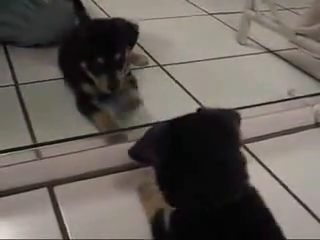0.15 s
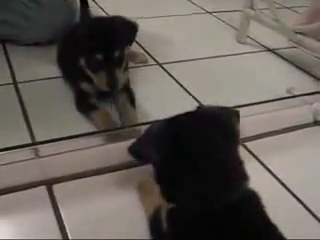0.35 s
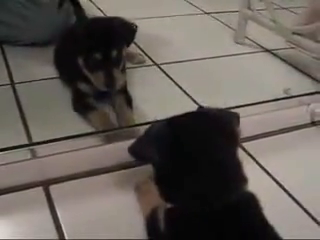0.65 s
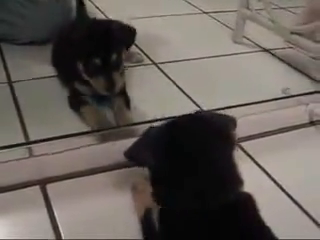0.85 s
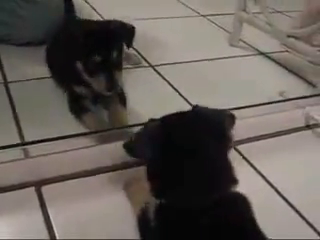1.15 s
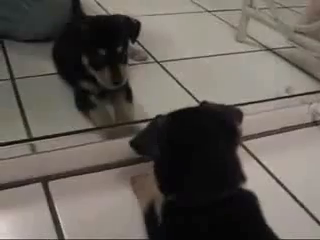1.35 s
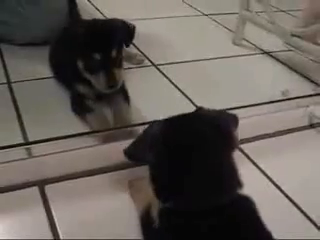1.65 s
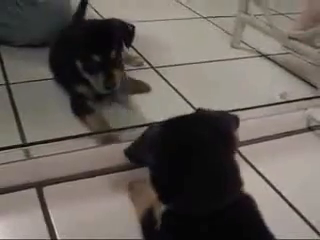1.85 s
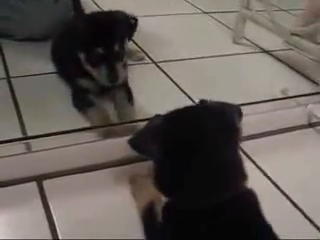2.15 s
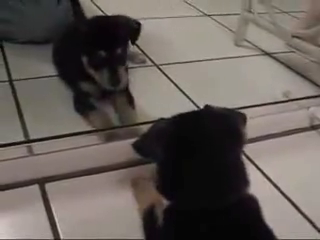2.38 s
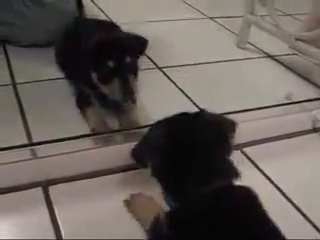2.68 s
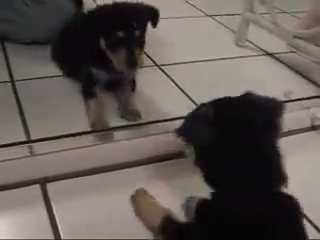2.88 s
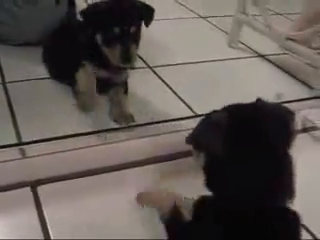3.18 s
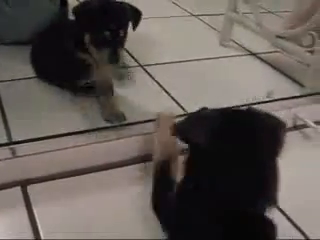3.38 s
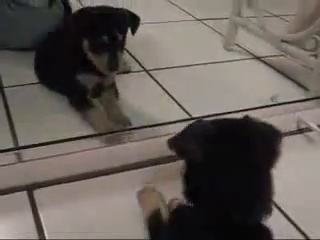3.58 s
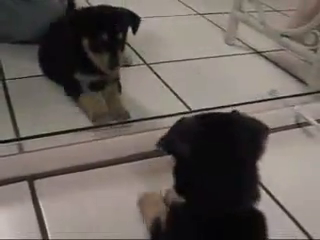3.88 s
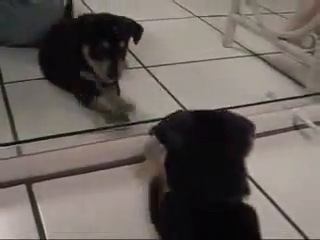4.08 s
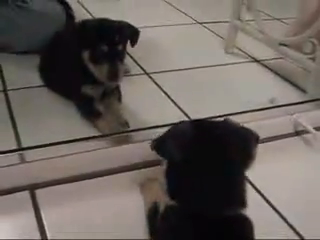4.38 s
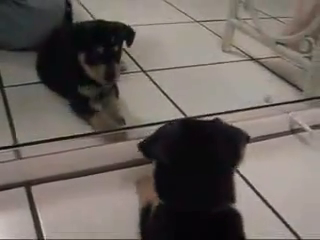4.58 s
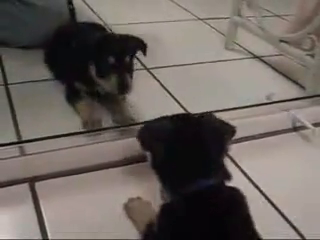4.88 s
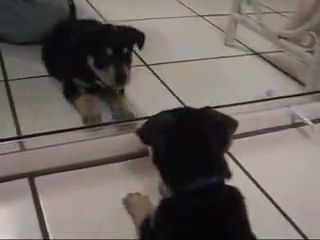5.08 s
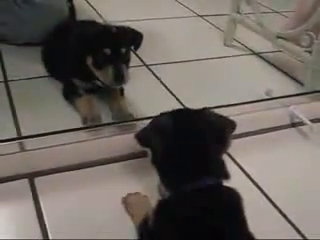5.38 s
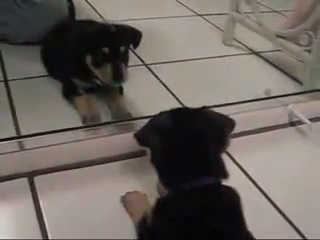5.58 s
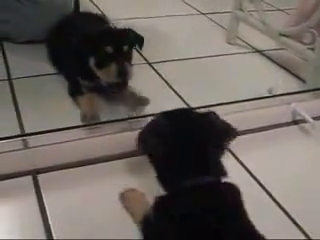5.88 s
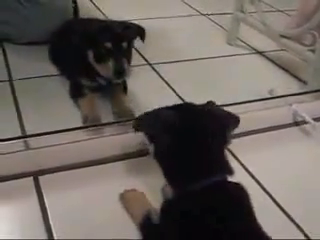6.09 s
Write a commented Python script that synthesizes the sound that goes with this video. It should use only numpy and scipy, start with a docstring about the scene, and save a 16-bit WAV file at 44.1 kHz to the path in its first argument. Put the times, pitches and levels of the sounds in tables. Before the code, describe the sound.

A puppy close by growls in low fluttering bursts and snaps out four sharp yaps, claws ticking on tile in a bare, echoing room.

```python
"""A puppy on a tiled floor growls at its mirror image in throbbing bursts and yaps sharply, close by.
Growls: a fluttering low tone, a rasp and mouth hiss. Yaps: leaping pitch through three moving mouth rings.
A huff and sniffs are filtered noise; claws on tile are decaying sines. The bare room adds a noisy tail.
Rumble, hiss and wavering machine tones lie behind; gain control ducks them while the dog is loud.
"""
import sys
import numpy as np
from scipy import signal
from scipy.io import wavfile
from scipy.ndimage import uniform_filter1d

SR = 44100
rng = np.random.default_rng(int(sys.argv[2]) if len(sys.argv) > 2 else 0)


def to_wav(sig):
    """Store sig (one row per channel, or 1-D mono) as 16-bit WAV at the path in sys.argv[1].

    Samples outside -1..1 are clipped; the rate is SR.
    """
    pcm = np.clip(np.atleast_2d(sig), -1, 1) * 32767
    pcm = np.round(pcm).astype(np.int16)
    wavfile.write(sys.argv[1], SR, pcm.T)  # frames by channels


N = 275184

# One curve table per growl: time_s, rasp_db, pitch_hz, tone_db, mouth_db (re throat), throbs_per_s
GROWL_CURVES = [
    [(0.0, -11.5, 173, -9.5, -14, 45), (0.054, -23, 176.6, -30.5, -34, 47),
     (0.07, -33, 175, -25, -21, 25.1)],
    [(0.22, -25, 142.2, -43, -17, 26), (0.234, -23, 144.6, -32, -19, 24.3),
     (0.266, -21, 178.3, -25.5, -15.5, 24.3), (0.304, -16, 180.1, -12.5, -19, 30.9),
     (0.388, -23, 182, -21, -20.5, 20.9), (0.422, -23, 159.7, -24, -19, 15.1),
     (0.468, -28.5, 156.6, -26.5, -32, 33.4), (0.5, -32, 186, -16, -21, 23.3)],
    [(0.74, -25, 178.7, -27, -14, 37), (0.768, -34, 181, -17, -19, 34),
     (0.814, -27.5, 200.9, -23.5, -15, 28), (0.852, -28.5, 177.7, -20, -15.5, 36),
     (0.912, -22.5, 180.5, -20, -12, 36), (0.922, -20, 185.2, -14.5, -25, 25),
     (0.996, -10, 189.4, -18, -5.5, 31), (1.02, -7, 208, -19, -0.5, 38)],
    [(1.905, -46, 181.2, -38.5, -16, 27), (1.965, -19, 157.2, -16, -16.5, 16),
     (2.081, -21, 180.6, -20, -18, 21), (2.137, -20.5, 152.4, -18.5, -23, 19.8),
     (2.315, -26.5, 159.6, -24.5, -28, 16.7), (2.345, -27.5, 147.3, -23.5, -33, 19.2),
     (2.553, -31, 146, -32, -32, 20.3), (2.61, -24, 181.5, -18.5, -13, 26.4)],
    [(3.63, -47, 176.6, -20, 4, 27.0), (3.65, -36, 172.6, -28.5, -14.5, 26.1),
     (3.79, -25, 181.1, -16, -21, 29.5), (3.806, -31, 183.8, -20.5, -7, 27.1),
     (3.934, -24, 189.9, -20.5, -22.5, 27.2), (4.046, -21, 175.1, -16, -5.5, 22.9),
     (4.118, -20, 175, -19.5, -16, 30), (4.15, -31, 174, -30, -40, 40)],
    [(5.742, -30.5, 184.4, -35, -9, 38), (5.774, -29, 191, -30, -28, 29.5),
     (5.8, -24, 213.7, -16.5, -16, 28.7), (5.816, -20, 210.2, -18, -28, 44.6),
     (5.846, -22.5, 179.6, -29, -9.5, 30.7), (5.876, -19, 170.2, -25, -19, 25.6),
     (5.912, -21.5, 178, -18, -7, 26.6), (5.93, 1, 177, -12, -2, 40)],
]
# One flutter row per growl: first_throb_s, rattle_power_share, sag_db (between throbs)
GROWL_FLUTTERS = [(.009, 0.1, -11.5), (0.263, 0.17, -6), (0.764, 0.41, -8.5), (1.931, 0.39, -3),
                  (3.646, 0.38, -8.5), (5.764, 0.95, -5)]
# Throat, mouth and hiss resonances of a growl: ring_hz, width_hz, relative_db
THROAT_RINGS = [(323, 225, 5.5), (549, 201, 4.5), (869, 174, -11)]
MOUTH_RINGS = [(948, 220, 2.5), (1317, 334, 7.5), (1800, 440, -6)]
HISS_RINGS = [(3540, 1400, 6), (4570, 550, -1.5), (7240, 1020, 2.5), (9690, 230, 1)]
CHEST_HZ, CHEST_WIDTH_HZ = 215, 90
HISS_RE_MOUTH_DB, HISS_DB_PER_MOUTH_DB = -9, 0.94
THROB_S, THROB_CREST_DB, THROB_UNEVEN_DB = 0.036, 2.5, 2.5

# One curve table per yap: time_s, pitch_hz, jaw_ring_db
YAP_CURVES = [
    [(.975, 267.4, -20), (1.0, 280.8, -9), (1.015, 283.8, -5), (1.04, 290.7, -10), (1.06, 284.2, -11.5)],
    [(2.6, 207.7, -26), (2.617, 260.3, -7.5), (2.64, 403.8, -13.5), (2.662, 460.2, 1.5),
     (2.685, 592.3, -19), (2.71, 732, -4), (2.733, 642, -8), (2.74, 556, 6)],
    [(4.701, 235, 17), (4.712, 279.9, -2), (4.73, 382.4, -1), (4.75, 501, 5), (4.767, 559, 11.5),
     (4.785, 525, 5), (4.8, 537, -34)],
    [(5.922, 243.6, -10), (5.935, 300, 2.5), (5.95, 420, 1.5), (5.97, 520, 4), (5.99, 623.2, -3),
     (6.01, 706.5, -4), (6.04, 616, 10.5), (6.055, 548.4, -17)],
]
# One mouth row per yap: jaw_least_hz, jaw_open_hz, jaw_end_hz, tongue_start_hz, front_end_hz,
# tongue_db, front_db, upper_rise_s, roughness_0_to_1
YAP_MOUTHS = [(910, 760, 399, 1720, 3900, -23, -25.5, 0.032, 0.44),
              (300, 1150, 930, 1467, 3460, -14.5, -12.5, 0.048, 0.31),
              (958, 1100, 850, 2290, 2620, -0.5, -3.5, 0.0054, 0.37),
              (300, 1130, 1090, 2870, 2960, -4, -5.5, .015, 0.33)]
# Ring widths of a yap: jaw_hz, tongue_hz, front_hz
YAP_WIDTHS_HZ = (420, 450, 750)
# High fixed rings of a yap: ring_hz, width_hz, level_db (re front ring)
YAP_TOP_RINGS = [(6780, 2280, -11.5), (9120, 880, -19.5)]
JAW_HARMONIC, JAW_CLOSE_S = 2, 0.03955
TONGUE_END_HZ, FRONT_START_HZ, GLIDE_POWER = 2180, 4410, 1.26
UPPER_FALL_S, UPPER_ENDS_DB = 0.015, -42
STEADY_S, STRAIN_PER_S = 0.05, 1.2

# Snort near the end of one growl: start_s, length_s, level_db
HUFF = (4.036, 0.036, -33)
# Hissy puffs like sniffs: start_s, length_s, level_db
SNIFFS = [(0.262, 0.095, -41.5), (1.258, 0.043, -43), (1.392, 0.097, -43), (1.467, 0.07, -42)]
# Resonances of the sniffs: ring_hz, width_hz, relative_db
SNIFF_RINGS = [(5540, 1300, -6.5), (2770, 2000, -9)]
# Claws on tile: start_s, tick_peak_db, thump_db (re tick peak)
TAPS = [(0.2177, -34, 17), (3.5568, -14.5, -7), (4.0219, -15.5, -10), (4.6128, -6, -16)]
# Tile modes: mode_hz, relative_db, t60_s
TILE_MODES = [(1620, 0, 0.01), (2710, -5, 0.003), (4500, 15, 0.0018), (6420, 1.5, 0.012), (7300, -23, .008)]
DIP_HZ, DIP_WIDTH_HZ = 5600, 1400  # band missing from the close sounds, sniffs excepted

# Tail spectrum: band_hz, t60_s, relative_db
ROOM_BANDS = [(185, 0.34, 3), (496, 0.47, 4), (734, 0.63, -3.5), (1064, 0.58, 4), (2330, 0.48, 5),
              (4040, 0.46, -0.5), (8050, 0.49, 2.5)]
ROOM_DB = -6.5

# Rumble colour: band_hz, relative_density_db
RUMBLE_SPECTRUM = [(15, -40), (25, 5), (119, -0.5), (133, -39.5), (150, -18), (160, -9), (210, -41),
                   (350, -120)]
# Slow swell of the rumble: time_s, level_db
RUMBLE_SWELL = [(0, -37), (.7, -37), (1.2, -37), (1.9, -30), (2.5, -53), (3.4, -33), (4.0, -46),
                (4.6, -34.5), (5.2, -38.5), (5.8, -33.5), (6.24, -42)]
# Hiss colour: band_hz, relative_density_db
HISS_SPECTRUM = [(88, -26), (150, 2.5), (247, -1.5), (936, -8), (1040, -10), (1160, -7.5), (3430, -10.5),
                 (7760, -17.5), (9780, -28), (10500, -59), (13600, -90), (22000, -120)]
HISS_DB = -41
# Machine tones: tone_hz, level_db_rms (before wavering)
WHINES = [(119, -47.5), (1034, -60.5), (3144, -62), (3402, -56), (7623, -64)]

DC_OFFSET, BAND_EDGE_HZ = 0.0163, 12350


def growl(rows, first_throb_s, rattle_share, sag_db):
    """A low tone throbs and rattles, under a rough throat and mouth rasp and hissing breath."""
    t, rasp_db, pitch_hz, tone_db, mouth_db, throbs_per_s = columns(rows)
    swell = throbbing(t, tone_db, np.clip(throbs_per_s, 10, 40), first_throb_s, sag_db)
    hiss_db = HISS_RE_MOUTH_DB + HISS_DB_PER_MOUTH_DB * mouth_db
    drive, puffs = folds(pitch_hz, jitter=0.055, rough=0.5, top_hz=2400)
    wavering_hz = pitch_hz * (1 + 0.035 * wobble(len(t), size=400))
    clean = np.sqrt(2) * sine(wavering_hz)
    chest = evened(resonate(puffs, CHEST_HZ, CHEST_WIDTH_HZ))
    tone = swell * (np.sqrt(1 - rattle_share) * clean + np.sqrt(rattle_share) * chest)
    flutter = (swell / uniform_filter1d(swell, size=3000)) ** 0.3  # shallower throb in the rasp
    rasp = evened(rings(drive, THROAT_RINGS))
    rasp += gain_of(mouth_db) * evened(rings(drive, MOUTH_RINGS))
    rasp += gain_of(hiss_db) * evened(rings(puffs, HISS_RINGS))
    fade = signal.windows.tukey(len(t), min(0.024 / (t[-1] - t[0]), 1))
    return t[0], (tone + gain_of(rasp_db) * flutter * rasp) * fade


def throbbing(t, tone_db, throbs_per_s, first_throb_s, sag_db):
    """Throat flutter: one rounded swell of uneven height per beat, over a sagging floor."""
    beats = np.cumsum(throbs_per_s * (t >= first_throb_s)) / SR
    at = np.flatnonzero(np.diff(np.ceil(beats), prepend=0))
    uneven_db = THROB_UNEVEN_DB * rng.standard_normal(len(at))
    peaks = gain_of(tone_db[at] + THROB_CREST_DB + uneven_db)
    train = np.zeros(len(t))
    train[at] = peaks
    swells = signal.oaconvolve(train, np.hanning(int(THROB_S * SR)), "same")
    return abs(swells) + np.interp(t, t[at], peaks) * gain_of(sag_db)


def yap(rows, least_hz, open_hz, end_hz, tongue_hz, front_hz, tongue_db, front_db, rise_s, rough):
    """The pitch leaps up as the jaw opens; three mouth rings slide over the harmonics."""
    t, pitch_hz, jaw_db = columns(rows)
    jaw_hz, tongue_hz, front_hz, upper_db = mouth_shape(
        t, pitch_hz, least_hz, open_hz, end_hz, tongue_hz, front_hz, rise_s)
    # jaw_db scales the whole mouth below: cancel it for the upper rings
    tongue_gain = gain_of(tongue_db + upper_db - jaw_db)
    front_db = front_db + upper_db - jaw_db
    # steady pitch at first, then growing waver
    strain = np.clip((t - t[0] - STEADY_S) * STRAIN_PER_S, 0.012, 0.055)
    drive, puffs = folds(pitch_hz, jitter=0.008 + 0.3 * strain, rough=rough, top_hz=12000)
    drive += 3.16 * rough * np.diff(puffs, prepend=0)  # breath noise rising toward the treble
    jaw_width, tongue_width, front_width = YAP_WIDTHS_HZ
    jaw = resonate(drive, jaw_hz, jaw_width)
    tongue = resonate(drive, tongue_hz, tongue_width)
    front = resonate(drive, front_hz, front_width)
    # squeal at the jaw ring takes over as the harmonic climbs past it
    squeal = sine(jaw_hz * (1 + strain * wobble(len(t), size=200)))
    squeal *= np.sqrt(2) * np.std(jaw) * gain_of(3 * wobble(len(t), size=150))
    takeover = np.clip((JAW_HARMONIC * pitch_hz - jaw_hz) / 120, 0, 0.8)
    mouth = (1 - takeover) * jaw + takeover * squeal - tongue_gain * tongue
    mouth += gain_of(front_db) * (front - rings(drive, YAP_TOP_RINGS))
    mouth += gain_of(front_db - 9.5) * resonate(puffs, 2470, 4360)  # hoarse breath between the rings
    lowest_db = 1 - 0.08 * np.maximum(pitch_hz - 240, 0)  # fades as the pitch rises
    mouth += gain_of(lowest_db) * resonate(drive, pitch_hz, 180)
    return t[0], gain_of(jaw_db) * mouth / np.std(jaw) * signal.windows.tukey(len(t), 0.06)


def mouth_shape(t, pitch_hz, least_hz, open_hz, end_hz, tongue_hz, front_hz, rise_s):
    """The jaw opens with the pitch and closes; upper rings glide while their level rises, holds, falls."""
    since_s = t - t[0]
    left_s = since_s[::-1]
    glide = (since_s / (t[-1] - t[0])) ** GLIDE_POWER
    closing = np.clip(1 - left_s / JAW_CLOSE_S, 0, 1)
    widest_hz = open_hz + (end_hz - open_hz) * closing
    jaw_hz = np.minimum(np.maximum(JAW_HARMONIC * pitch_hz, least_hz), widest_hz)
    jaw_hz = uniform_filter1d(jaw_hz, size=400)
    reach = np.clip(glide * (pitch_hz.max() - 250) / 350, 0, 1)  # a low yap hardly moves the tongue
    tongue_hz = tongue_hz + (TONGUE_END_HZ - tongue_hz) * reach
    front_hz = FRONT_START_HZ + (front_hz - FRONT_START_HZ) * glide
    closed = np.maximum(1 - since_s / rise_s, 0) + np.maximum(1 - left_s / UPPER_FALL_S, 0)
    return jaw_hz, tongue_hz, front_hz, UPPER_ENDS_DB * closed


def folds(pitch_hz, jitter, rough, top_hz):
    """Vocal folds: wavering harmonic pulses blended with noise that puffs once a cycle."""
    turns = np.cumsum(pitch_hz * (1 + jitter * wobble(len(pitch_hz), size=150))) / SR
    pulses = sum(np.cos(2 * np.pi * k * turns) * (k * pitch_hz < top_hz)
                 for k in range(1, int(top_hz / pitch_hz.min())))
    puffs = (0.75 + np.exp(-(turns % 1) / 1.1)) * rng.standard_normal(len(pitch_hz))
    puffs = evened(puffs)
    density = np.sqrt(SR / 2 / top_hz)
    return (1 - rough) * evened(pulses) + rough * density * puffs, puffs


def breath(length_s, level_db, ring_table, fade_share):
    """Breath turbulence: a noise burst through fixed resonances, for the huff and the sniffs."""
    puff = evened(rings(rng.standard_normal(int(length_s * SR)), ring_table))
    return gain_of(level_db) * puff * signal.windows.tukey(len(puff), fade_share)


def tap(peak_db, thump_db):
    """A claw strikes tile modes with a burst of ticks within 1.4 ms; the paw pad thumps under it."""
    t = np.arange(2000) / SR
    ring = sum(gain_of(db - 60 * t / t60_s) * np.sin(2 * np.pi * hz * t)
               for hz, db, t60_s in TILE_MODES)
    ticks = rng.standard_normal(60) * np.hanning(60)
    tick = np.convolve(ring, ticks)[:len(t)]
    thump = np.sin(2 * np.pi * 130 * t) * np.exp(-t / 0.0045)
    return gain_of(peak_db) * (tick / abs(tick).max() + gain_of(thump_db) * thump)


def room(x):
    """Sparse echoes of random sign off tile, glass and walls; each band dies at its own speed."""
    echoes = np.zeros(SR)
    at = np.arange(200, SR - 20, 20) + rng.integers(0, 20, (SR - 201) // 20)
    echoes[at] = rng.choice([-1.0, 1.0], at.shape)
    hz, t, z = signal.stft(echoes, SR, nperseg=512)
    bands = np.array(ROOM_BANDS)
    t60_s = read(bands[:, [0, 1]], hz)[:, None]
    level_db = read(bands[:, [0, 2]], hz)[:, None]
    tail = signal.istft(z * gain_of(level_db - 60 * t / t60_s), SR, nperseg=512)[1]
    return signal.fftconvolve(x, tail / np.linalg.norm(tail))[:N]


def background():
    """Lumpy rumble, hiss and machine tones wavering in level and phase."""
    t = np.arange(N) / SR
    swell_db = np.interp(t, *np.transpose(RUMBLE_SWELL))
    mix = gain_of(swell_db) * noise(RUMBLE_SPECTRUM, patchy_db=4.5)
    mix += gain_of(HISS_DB) * noise(HISS_SPECTRUM, patchy_db=1.5)
    for hz, db in WHINES:
        level = np.sqrt(2) * gain_of(db + 1.8 * wobble(N, size=1500))
        mix += level * np.sin(2 * np.pi * hz * t + 0.22 * wobble(N, size=3000))
    return mix


def noise(spectrum, patchy_db):
    """Coloured noise of rms 1 whose spectrum has drifting patches."""
    frames, hz = N // 512 + 5, np.fft.rfftfreq(2048, 1 / SR)
    a, b, patches = rng.standard_normal((frames, 1025, 3)).T
    patches = uniform_filter1d(patches, size=12, axis=0)
    patches = evened(uniform_filter1d(patches, size=6, axis=1))
    z = (a + 1j * b) * gain_of(read(spectrum, hz)[:, None] + patchy_db * patches)
    return evened(signal.istft(z, nperseg=2048, noverlap=1536)[1][:N])


def resonate(x, hz, width_hz):
    """A gain-1 resonance tracking hz: shift to zero, two one-pole lowpasses, shift back."""
    turn = np.exp(2j * np.pi * np.cumsum(hz * np.ones(len(x))) / SR)
    r = np.exp(-np.pi * width_hz / SR)
    two_poles = np.convolve([1, -r], [1, -r])
    return 2 * (turn * signal.lfilter([(1 - r) ** 2], two_poles, x / turn)).real


def rings(x, table):
    """Parallel fixed resonances of alternating sign."""
    return sum((-1) ** k * gain_of(db) * resonate(x, hz, width_hz)
               for k, (hz, width_hz, db) in enumerate(table))


def sine(hz):
    """A sine following a frequency curve."""
    return np.sin(2 * np.pi * np.cumsum(hz) / SR)


def wobble(n, size):
    """Smooth random curve of rms 1, changing over about size samples."""
    return evened(uniform_filter1d(uniform_filter1d(rng.standard_normal(n), size), size))


def gain_of(db):
    """Decibels to amplitude gain."""
    return 10 ** (np.asarray(db) / 20)


def evened(x):
    """Scales to rms 1."""
    return x / np.sqrt(np.mean(x ** 2) + 1e-20)


def read(points, hz):
    """Interpolates a spectrum on a log-frequency axis."""
    f, value = np.transpose(points)
    return np.interp(np.log(hz + 1), np.log(f + 1), value)


def columns(rows):
    """Samples a curve table at SR: times, then each column."""
    s, *values = np.transpose(rows)
    t = np.arange(s[0], s[-1], 1 / SR)
    return t, *(np.interp(t, s, v) for v in values)


def add(mix, start_s, sound):
    """Adds a sound to the mix in place."""
    part = mix[round(start_s * SR):][:len(sound)]
    part += sound[:len(part)]


def scene():
    """The dog, its room tail and the background."""
    dog, sniffs = np.zeros(N), np.zeros(N)
    for rows, flutter in zip(GROWL_CURVES, GROWL_FLUTTERS):
        add(dog, *growl(rows, *flutter))
    for rows, mouth in zip(YAP_CURVES, YAP_MOUTHS):
        add(dog, *yap(rows, *mouth))
    huff_s, length_s, level_db = HUFF
    add(dog, huff_s, breath(length_s, level_db, HISS_RINGS, fade_share=0.5))
    for start_s, peak_db, thump_db in TAPS:
        add(dog, start_s, tap(peak_db, thump_db))
    for start_s, length_s, level_db in SNIFFS:
        add(sniffs, start_s, breath(length_s, level_db, SNIFF_RINGS, fade_share=0.6))
    dip = signal.iirnotch(DIP_HZ, DIP_HZ / DIP_WIDTH_HZ, SR)
    close = signal.lfilter(*dip, dog) + sniffs
    # low cut at 105 Hz keeps the close sounds free of thumps from short growl fades
    close = signal.sosfilt(signal.butter(4, 105, "high", fs=SR, output="sos"), close)
    return (close + gain_of(ROOM_DB) * room(close) + background())[None]


def record(dry):
    """Treble-led gain control, fast down and slow up; soft overload, dull top, offset, band limit."""
    heard = signal.sosfilt(signal.butter(2, 700, "high", fs=SR, output="sos"), dry[0])
    power_db = 10 * np.log10(abs(uniform_filter1d(heard ** 2, size=400)) + 1e-12)
    fall_db = np.arange(N) * 64.5 / SR  # the held level falls 64.5 dB/s
    held_db = np.maximum.accumulate(power_db + fall_db) - fall_db
    over_db = np.maximum(held_db + 24, 0)  # threshold -24 dB
    ducked = dry / gain_of(0.46 * uniform_filter1d(over_db, size=200))
    soft = 0.8 * np.tanh(ducked / 0.8)
    dull = signal.sosfilt(signal.butter(7, 9900, fs=SR, output="sos"), soft)
    band_limit = signal.firwin(511, BAND_EDGE_HZ, window=("kaiser", 9), fs=SR)
    return signal.oaconvolve(dull + DC_OFFSET, band_limit[None], "same")


dry = scene()
out = record(dry)
to_wav(out)
```